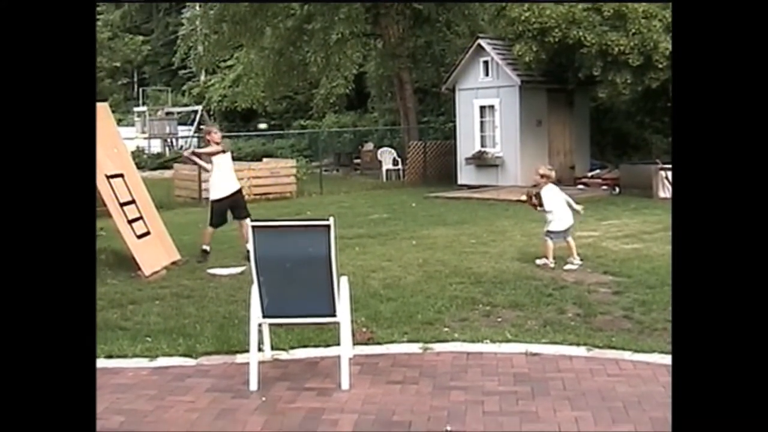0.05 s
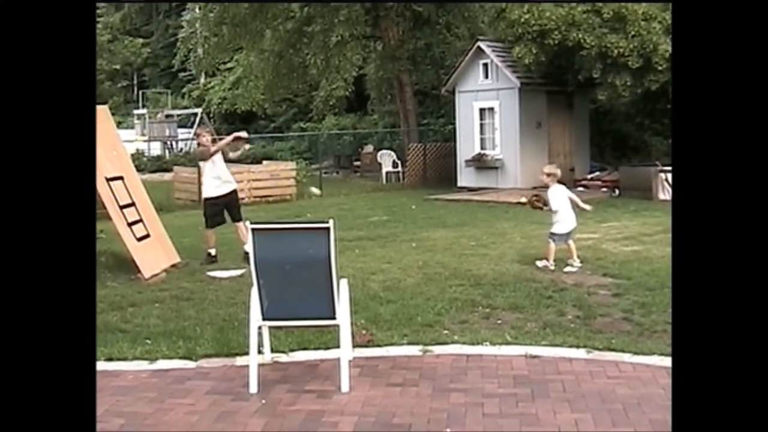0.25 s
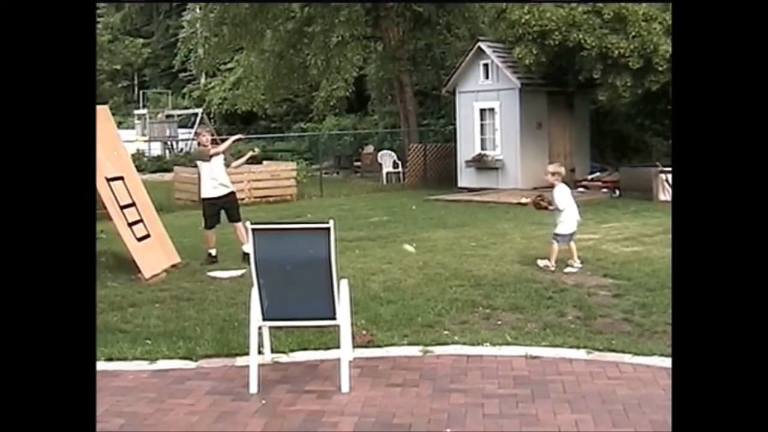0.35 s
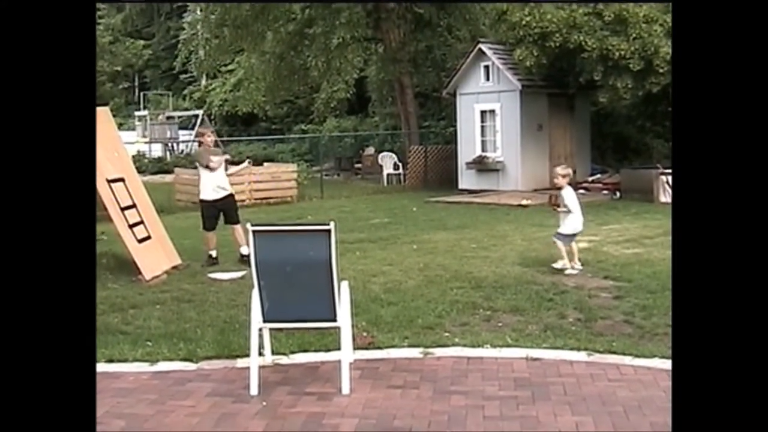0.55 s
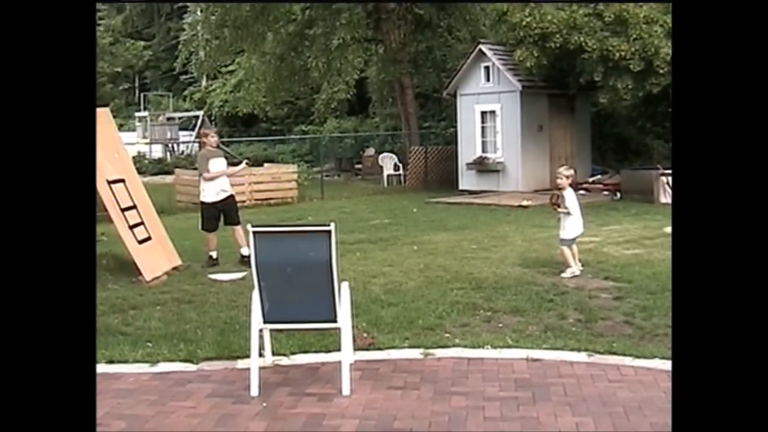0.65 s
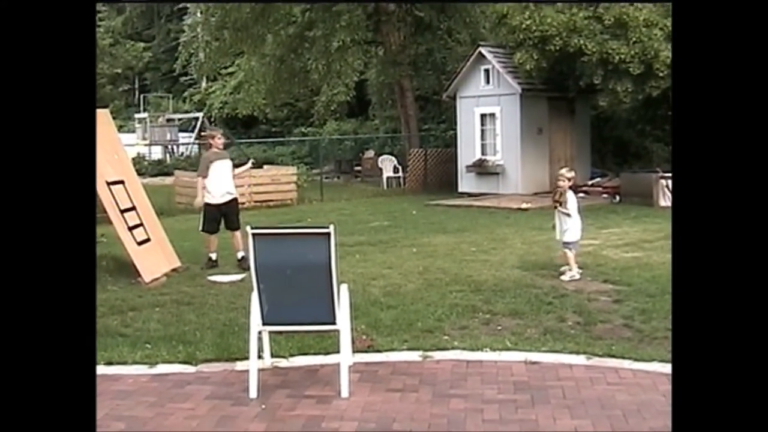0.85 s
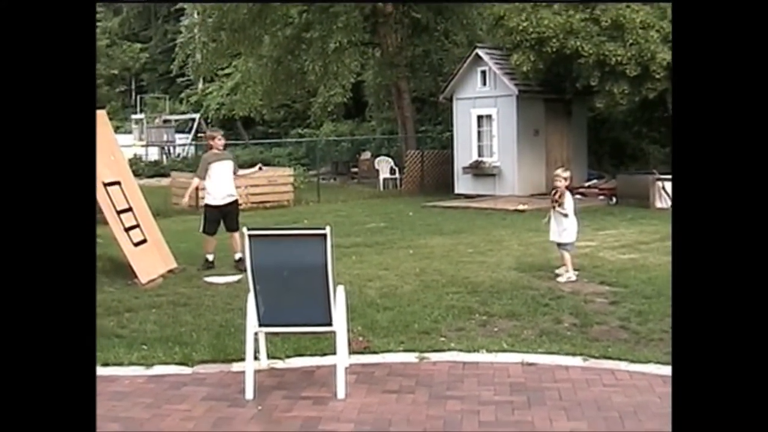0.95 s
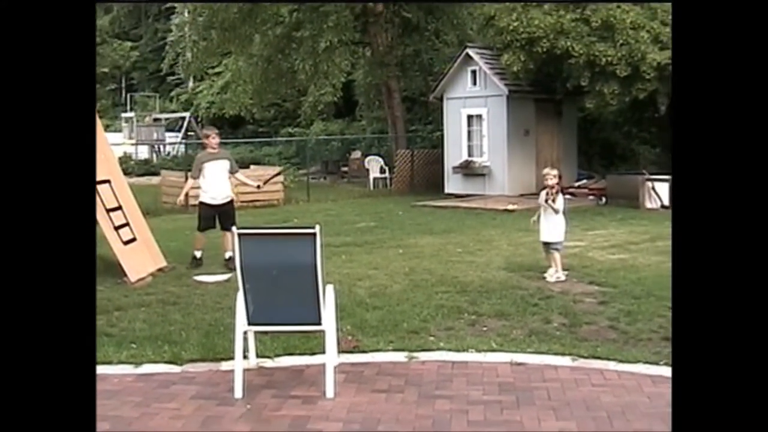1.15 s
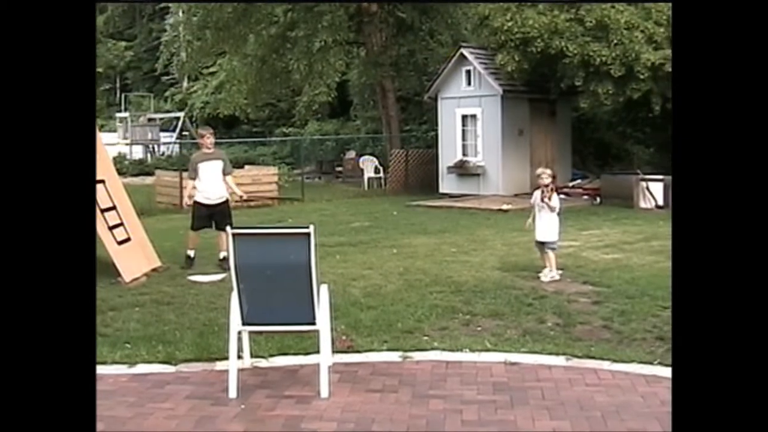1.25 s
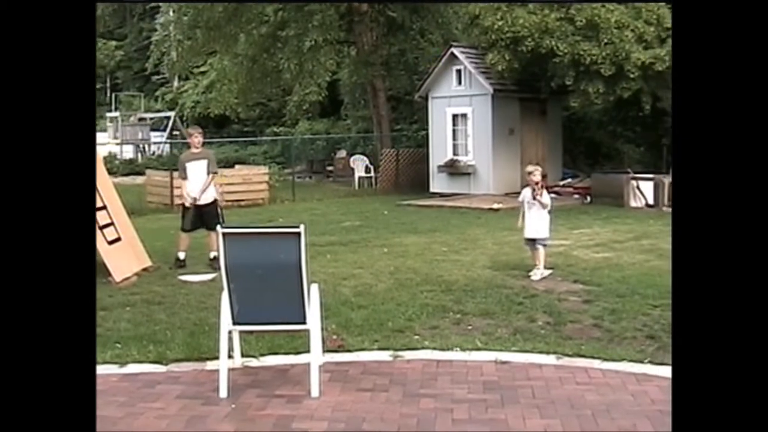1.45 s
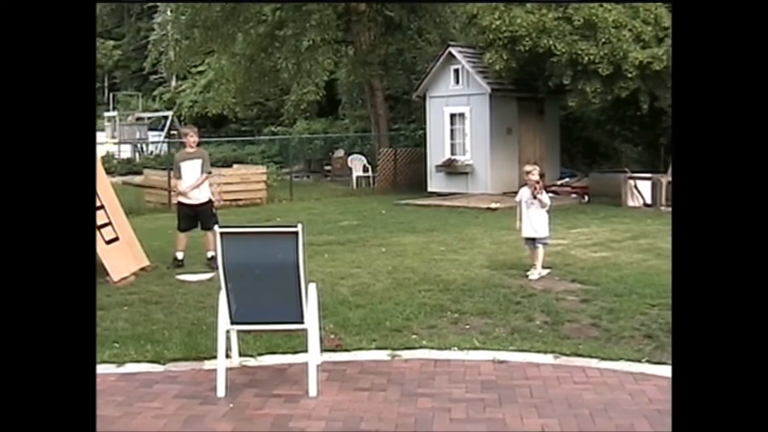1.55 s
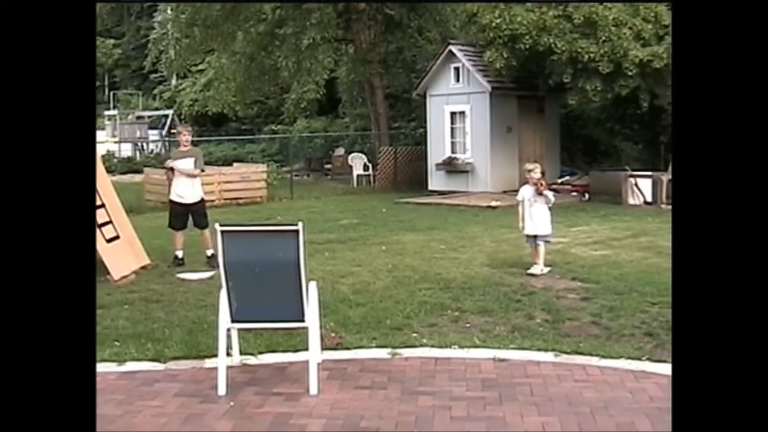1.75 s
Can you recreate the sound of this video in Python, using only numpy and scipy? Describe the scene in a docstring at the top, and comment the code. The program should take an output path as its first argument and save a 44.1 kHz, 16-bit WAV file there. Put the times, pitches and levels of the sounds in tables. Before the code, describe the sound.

A hollow plastic bat hits a ball with one sharp, slightly distorted crack that echoes briefly around a backyard. A dull thud and a light knock follow, over soft hiss and low rumble, several metres from the microphone.

```python
"""A back yard, heard from a camcorder's microphones: soft hiss, low rumble and the motor's faint whine.
At 0.22 s, some metres off and a little left, a hollow plastic bat cracks against a ball and overloads
the input. Trees and sheds scatter the crack back. A dull thud follows at 0.5 s, a light knock at 0.72 s,
then a softer thud and three faint ticks. Throughout, a comb filter notches the motor's overtones."""
import sys
import numpy as np
from scipy import signal
from scipy.fft import rfft, irfft
from scipy.io import wavfile

SR = 44100
rng = np.random.default_rng(int(sys.argv[2]) if len(sys.argv) > 2 else 0)


def unload_wav(signal):
    """Save mono or channel-first audio to the path in sys.argv[1] as 16-bit WAV at rate SR, clipped to [-1, 1]."""
    wavfile.write(
        sys.argv[1],
        SR,
        np.round(np.clip(np.atleast_2d(signal).T, -1, 1) * 32767).astype(np.int16),
    )


N = 79380  # 1.8 s
TIME_S = np.arange(N) / SR
BIN_HZ = np.arange(N // 2 + 1) * SR / N


def undb(db):
    """Decibels to gain."""
    return 10 ** (np.asarray(db) / 20)


def curve_db(points):
    """Level at each bin, from (frequency, level) points joined on a log-frequency axis."""
    rows = np.array(points, float)
    return np.interp(np.log(BIN_HZ + 1), np.log(rows[:, 0]), rows[:, 1])


def shaped_noise(gains):
    """White noise weighted bin by bin, then scaled to rms 1."""
    noise = irfft(rfft(rng.standard_normal(N)) * gains, N)
    return noise / np.sqrt(np.mean(noise ** 2))


def coloured(points, tilt_db=0):
    """Noise of rms 1 with the given spectrum, tilted per octave."""
    return shaped_noise(undb(curve_db(points) + tilt_db * np.log2(BIN_HZ + 1)))


def narrow(hz, width):
    """Noise of rms 1 in one resonance; at 0 Hz, a slow random wander."""
    return shaped_noise(1 / (1 + ((BIN_HZ - hz) / width) ** 2))


def since(start):
    """Seconds since a moment, zero before it."""
    return np.maximum(TIME_S - start, 0)


def rise(start, rise_s):
    """Softened onset, from 0 towards 1."""
    return 1 - np.exp(-since(start) / rise_s)


def fade(start, t60):
    """Instant attack, then a fall of 60 dB every t60 seconds."""
    age = since(start)
    return (age > 0) * np.exp(-np.log(1000) * age / t60)


def ring(start, modes):
    """Damped modes struck at one moment."""
    age = since(start)
    return sum(undb(db) * fade(start, t60) * np.sin(2 * np.pi * hz * age) for hz, db, t60 in modes)


def spread(side):
    """Opposite signs left and right."""
    return np.array([side, -side])


# open-air hiss, alike at both microphones (frequency [Hz], relative level [dB])
HISS_CENTRE = [(100, -6), (400, 0), (800, 0), (1200, -3), (2200, -6.5), (4000, -9.5), (5000, -7),
               (6000, -7.5), (6800, -19), (7800, -27), (10000, -23.5), (12500, -31.5)]
# hiss and an 11 kHz whine, in opposite phase at the two microphones (frequency [Hz], relative level [dB])
HISS_SIDE = [(100, -1.5), (500, -1.5), (1000, -5), (2000, -16.5), (4000, -17.5), (6200, -17), (7500, -23.5),
             (10000, -22), (11000, -7.5), (12500, -49)]
def hiss():
    """Soft hiss near the centre, with a little width and a faint high camcorder whine."""
    return undb(-61) * coloured(HISS_CENTRE) + spread(undb(-66) * coloured(HISS_SIDE))


# the low end of the yard's ambience (frequency [Hz], relative level [dB])
RUMBLE_SPECTRUM = [(20, -29), (40, -3), (65, 0.5), (100, -1), (118, 4), (140, -3.5), (190, -6), (232, -5),
                   (280, -19), (500, -47), (2000, -68)]
def rumble():
    """Separate low noise at each microphone, stronger on the left; the level flutters slightly."""
    flutter_db = 0.15 * narrow(0, width=8.3)
    return np.array([undb(db + flutter_db) * coloured(RUMBLE_SPECTRUM) for db in (-52.5, -59.5)])


# faint swells in the ambience (time [s], half-length [s], frequency [Hz], half-width [Hz], level [dB])
HISS_SWELLS = [(0.14, 0.29, 832, 90, -64), (0.55, 0.01, 5250, 110, -58.5), (0.957, 0.019, 1520, 150, -63),
               (0.958, 0.065, 2420, 130, -68.5), (1.07, 0.11, 2430, 160, -70.5),
               (1.166, 0.081, 1710, 127, -70.5)]
def swells():
    """Narrow bands rise out of the hiss and sink back."""
    return sum(undb(db) * narrow(hz, width) * np.exp(-((TIME_S - centre) / length) ** 2)
               for centre, length, hz, width, db in HISS_SWELLS)


# the camcorder's own tones, right by the microphones (frequency [Hz], starting level [dB], drift [dB/s])
CAMCORDER_TONES = [(147, -66, 0), (4507, -66, -1.5), (5395, -67.5, 1.5), (5980, -76, 1.5),
                   (9140, -92.5, 1.5), (15734, -96, 0)]
def camcorder():
    """Motor hum and whine, plus a thin video line whistle; all wobble slightly in pitch."""
    pitch_ratio = 1 + 0.00105 * narrow(0, width=11.2)
    wobbled_s = np.cumsum(pitch_ratio) / SR
    return np.sqrt(2) * sum(undb(db + drift * TIME_S) * np.sin(2 * np.pi * hz * wobbled_s)
                            for hz, db, drift in CAMCORDER_TONES)


# the knock's rustle, then three faint ticks (time [s], relative level [dB], tilt [dB/octave])
TICK_EVENTS = [(0.7195, 6, -5.5), (1.192, -18, 11), (1.452, -12.5, 1), (1.603, -11, 4.5)]
# a tick's colour before its tilt (frequency [Hz], relative level [dB])
TICK_SPECTRUM = [(150, -22), (330, -20), (500, 3.5), (1000, -0.5), (2800, -11.5), (5000, -13), (6500, -22),
                 (9000, -32), (12000, -58)]
def ticks():
    """Short bursts of noise, each with a faint tail."""
    out = 0
    for start, db, tilt in TICK_EVENTS:
        decay = fade(start, t60=0.011) + undb(-5.5) * fade(start, t60=0.11)
        out += undb(db - 45.5) * coloured(TICK_SPECTRUM, tilt) * decay * rise(start, rise_s=0.00038)
    return out


# a light knock out in the yard (frequency [Hz], level [dB], t60 [s])
KNOCK_RING = [(522.5, -46, 0.059), (800, -35.5, 0.012), (1044, -30.5, 0.0073), (1820, -45, 0.016)]
def knock(start_s=0.7206):
    """A slightly cushioned tap rings a few short modes."""
    return ring(start_s, KNOCK_RING) * rise(start_s, rise_s=0.00049)


# dull thuds on the lawn (time [s], boom gain [dB], hollow ring gain [dB])
LAWN_THUDS = [(.4978, -3, 3.5), (0.5004, 2, -2), (0.775, -16, -36)]
# a thud's low boom (frequency [Hz], relative level [dB], t60 [s])
THUD_BOOM = [(163, -39.5, 0.12), (215, -31.5, 0.088)]
# a thud's hollow ring (frequency [Hz], relative level [dB], t60 [s])
THUD_HOLLOW = [(1050, -33, 0.021), (1300, -48, 0.015)]
def thuds():
    """Soft contacts, likely the ball or a foot landing on the lawn; the first two merge into one."""
    out = 0
    for start, boom_db, hollow_db in LAWN_THUDS:
        boom = undb(boom_db) * ring(start, THUD_BOOM)
        hollow = undb(hollow_db) * ring(start, THUD_HOLLOW)
        out += (boom + hollow) * rise(start, rise_s=0.001)
    return out


# scatter reaching the microphones from around the yard (frequency [Hz], relative level [dB], t60 [s])
YARD_BANDS = [(100, -19, 0.71), (219, 7.5, 0.71), (333, -14, 1.3), (420, 0.5, 1.4), (750, -8, 1.4),
              (1150, 2, 0.87), (1600, -2.5, 1.36), (2040, -2, 1.3), (2800, -3.5, 1.02), (4600, -4, 0.93),
              (6340, -8, 0.85), (7700, -19, 0.59), (9160, -17.5, 0.71), (12300, -38, .4)]
# stronger returns from shed and trees farther off (delay [s], boost [dB], half-length [s])
YARD_ECHOES = [(.145, 2, 0.035), (.205, 2, 0.019)]
# the bat's main tones lingering in the yard (frequency [Hz], level [dB], half-width [Hz], t60 [s])
LINGERING_TONES = [(405, -50.5, 30, 1.3), (506, -49.5, 52, 1.28), (742, -46.5, 54, 1.45),
                   (1025, -43.5, 58, 1.44), (1343, -53, 25, 0.98), (2300, -60, 40, 0.74)]
def yard():
    """Diffuse scatter of the crack; the top treble dies first, and far surfaces add swells."""
    start = BAT_SNAPS[0][0]  # the moment of the crack
    spectrum = rfft(coloured(YARD_BANDS))
    band_hz, _, band_t60 = np.transpose(YARD_BANDS)
    shares = [np.interp(BIN_HZ, band_hz, band) for band in np.eye(len(band_hz))]  # overlapping bands
    tail = sum(irfft(spectrum * share, N) * fade(start, t60) for share, t60 in zip(shares, band_t60))
    tones = sum(undb(db) * narrow(hz, width) * fade(start, t60) for hz, db, width, t60 in LINGERING_TONES)
    echo_db = sum(db * np.exp(-((since(start) - delay) / length) ** 2)
                  for delay, db, length in YARD_ECHOES)
    return (undb(-37.5) * tail + tones) * rise(start, rise_s=0.024) * undb(echo_db)


# the crack, two sharp snaps some metres from the microphones (time [s], relative level [dB])
BAT_SNAPS = [(.2204, 3.5), (.2252, 3.5)]
# colour of each snap (frequency [Hz], relative level [dB])
SNAP_SPECTRUM = [(100, -26.5), (400, -9), (1500, 13), (2800, 1.5), (4500, 2.5), (6300, 7.5), (7500, -5.5),
                 (9000, 1), (10500, -31), (15000, -32)]
# modes of bat and ball (frequency [Hz], relative level [dB], t60 [s])
BAT_RING = [(189, -24, 0.052), (244, -16.5, 0.032), (410.7, -21.5, .13), (505, -16.5, 0.037),
            (551, -21.5, 0.073), (755.6, -17.5, 0.077), (825, -26, 0.14), (1006, -9.5, 0.047),
            (1104, -28, 0.176), (1322, -26.5, 0.1), (1400, -27, 0.035), (1590, -19, 0.033),
            (1695, -31, .08), (1960, -24, 0.029), (2340, -23.5, 0.05), (2433, -28.5, 0.066),
            (3900, -19.5, 0.074), (4503, -26, 0.11), (4530, -27.5, 0.042), (5345, -31, 0.088),
            (6124, -10.5, 0.015)]
def bat():
    """The blow rings the hollow bat; each snap is a noise burst with a short tail of dense shell modes."""
    out = undb(-2.5) * ring(BAT_SNAPS[0][0], BAT_RING)
    for start, db in BAT_SNAPS:
        burst = undb(-11.5) * fade(start, t60=0.0065)
        shell = undb(-25.5) * fade(start, t60=0.045)
        out += undb(db) * coloured(SNAP_SPECTRUM) * (burst + shell)
    return out


# the play at the left microphone over the right (frequency [Hz], level [dB])
LEFT_OVER_RIGHT = [(100, 4), (250, 4), (600, 2.5), (1500, .5), (6000, 0.7), (8500, -12), (12000, -0.5)]
def scene():
    """From where the camcorder stands, the play is a little to the left; the yard's scatter is wider."""
    play = bat() + yard() + thuds() + knock() + ticks()
    balance = undb(spread(curve_db(LEFT_OVER_RIGHT)) / 2)
    placed = irfft(rfft(play) * balance, N)
    wide_scatter = spread(undb(-13) * yard())
    return placed + wide_scatter + hiss() + rumble() + swells() + camcorder()


OVERLOAD_DB, OVERLOAD_HARDNESS = -14.5, 5
BASS_CUT_HZ, SHELF_HZ, SHELF_DB, TOP_HZ = 61, 9000, -5, 15750
NOTCH_SPACING_HZ, NOTCH_DEPTH, NOTCH_FEEDBACK = 300, 0.91, 0.6
def record(dry):
    """The input overloads, treble and bass are trimmed, a comb thins the motor's whine, the top is cut."""
    drive = np.abs(dry / undb(OVERLOAD_DB))
    clipped = dry / (1 + drive ** OVERLOAD_HARDNESS) ** (1 / OVERLOAD_HARDNESS)
    shelf_db = SHELF_DB / (1 + (SHELF_HZ / (BIN_HZ + 1)) ** 20)
    shelved = irfft(rfft(clipped) * undb(shelf_db), N)
    trimmed = signal.sosfilt(signal.butter(2, BASS_CUT_HZ, "high", fs=SR, output="sos"), shelved)
    gap = np.zeros(round(SR / NOTCH_SPACING_HZ) - 1)  # the comb's delay
    combed = signal.lfilter(np.r_[1, gap, -NOTCH_DEPTH], np.r_[1, gap, -NOTCH_FEEDBACK], trimmed)
    return signal.sosfilt(signal.ellip(8, .2, 70, TOP_HZ, fs=SR, output="sos"), combed)


dry = scene()
out = record(dry)
unload_wav(out)
```